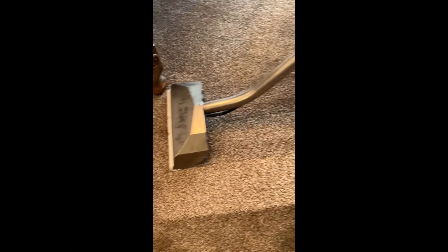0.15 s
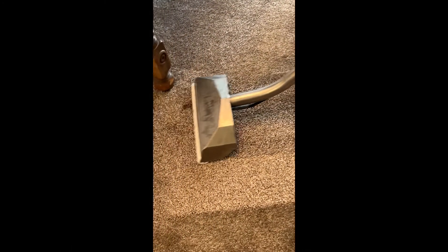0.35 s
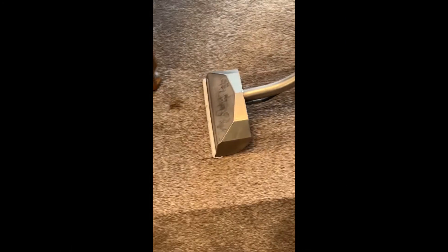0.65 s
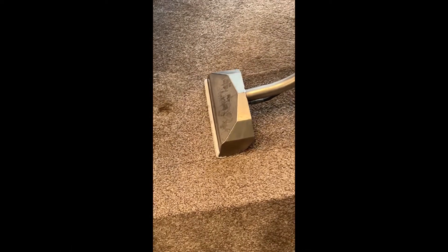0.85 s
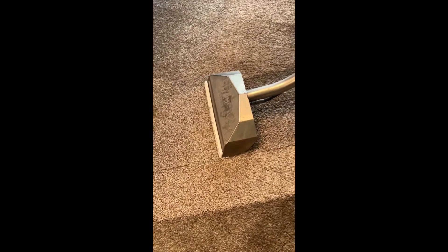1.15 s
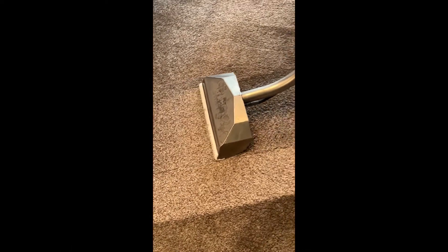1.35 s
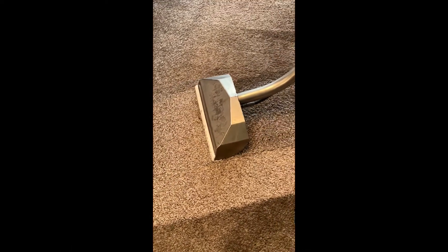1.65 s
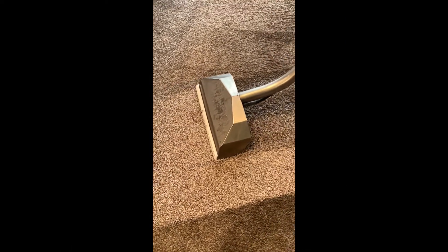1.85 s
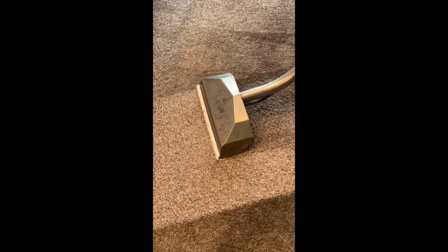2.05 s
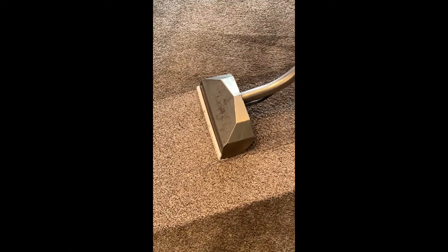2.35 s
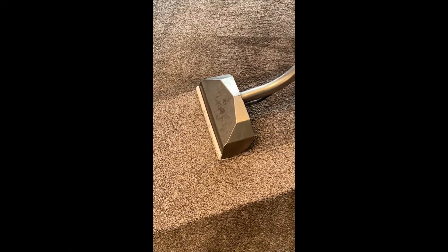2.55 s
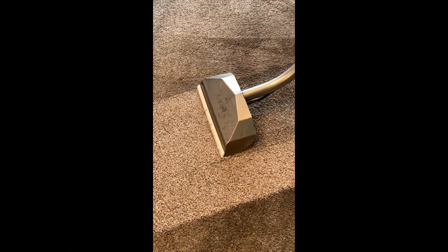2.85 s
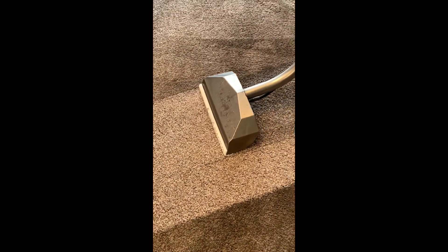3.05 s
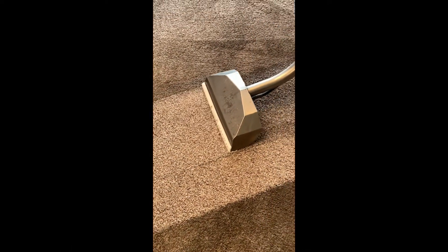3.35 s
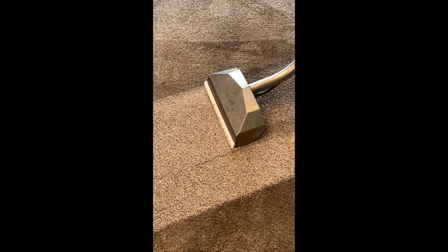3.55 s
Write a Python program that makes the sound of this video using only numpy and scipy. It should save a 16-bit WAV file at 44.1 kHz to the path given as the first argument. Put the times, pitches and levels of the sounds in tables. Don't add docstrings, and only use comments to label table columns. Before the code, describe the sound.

Carpet vacuum nozzle rushing air, hissing and whistling shrilly, with one short drag at the start.

```python
import sys
import numpy as np
from scipy import signal
from scipy.fft import rfft, irfft, next_fast_len
from scipy.io import wavfile
from scipy.ndimage import uniform_filter1d

SR = 44100
rng = np.random.default_rng(int(sys.argv[2]) if len(sys.argv) > 2 else 0)


def volts_from_db(level):
    exponent = np.asarray(level, float) / 20
    return 10 ** exponent


def inscribe(sig):
    pcm = np.round(np.clip(np.atleast_2d(sig).T, -1, 1) * 32767)
    wavfile.write(sys.argv[1], SR, pcm.astype(np.int16))


N = 163170
T = np.arange(N) / SR


def evened(x):
    return x / np.sqrt(np.mean(abs(x) ** 2) + 1e-20)


def read(points, hz):
    f, db = np.transpose(points)
    return np.interp(np.log(hz + 1), np.log(f + 1), db)


def follow(points):
    return np.interp(T, *np.transpose(points))


def drift(hz):
    hop = 32
    f = np.fft.fftfreq(N // hop + 2, hop / SR)
    chance = rng.standard_normal((len(f), 2)) @ [1, 1j]
    slow = evened(np.fft.ifft(chance / (1 + (f / hz) ** 2)))
    return np.interp(np.arange(N) / hop, np.arange(len(f)), slow)


def tone(hz, db, share, fade_hz):
    share = np.clip(share, 0, 1)
    strength = np.sqrt(1 - share ** 2) + share * drift(fade_hz)
    turns = np.cumsum(hz * np.ones(N)) / SR + rng.random()
    return np.sqrt(2) * volts_from_db(db) * (strength * np.exp(2j * np.pi * turns)).real


# pitch_hz, level_db [rms], fading_share [0..1]
HUM_LINES = [(58.2, -40.5, 0.23), (104, -52.5, 0.92), (161, -57.5, 0.98), (224, -51.5, 0.42),
             (371.8, -46.5, 0.05), (740, -54, 0.59)]


def blower():
    hum = 0
    for hz, db, share in HUM_LINES:
        hum = hum + tone(hz * (1 + 0.00594 * drift(1.315).real), db, share, fade_hz=5.1)
    return hum


# from_hz, most_hz, to_hz, unlike_share [0..1]
UNLIKE_BANDS = [(230, 750, 1600, .17), (4400, 4700, 5035, .22), (5065, 5350, 5650, .3),
                (8200, 9500, 13000, .5), (15000, 15400, 16000, .045)]


def air(shape, patchy_db, swell_db):
    frames, hz = N // 256 + 5, np.fft.rfftfreq(1024, 1 / SR)
    a, b, c, d, patches = rng.standard_normal((frames, 513, 5)).T
    patches = uniform_filter1d(patches, size=12, axis=1)
    patches = evened(uniform_filter1d(patches, size=14, axis=0))
    swell = np.interp(np.arange(frames) * 256, np.arange(N), drift(1.2).real)
    unlike = 0
    for low, most, high, share in UNLIKE_BANDS:
        unlike = unlike + share * np.sqrt(np.interp(hz, [low, most, high], [0, 1, 0]))
    same = np.clip(1 - unlike, 0, 1)[:, None]
    left = a + 1j * b
    right = same * left + np.sqrt(1 - same ** 2) * (c + 1j * d)
    level_db = read(shape, hz)[:, None] + patchy_db * patches + swell_db * swell
    spectrum = np.array([left, right]) * volts_from_db(level_db)
    return evened(signal.istft(spectrum, nperseg=1024, noverlap=768)[1][:, :N])


def leak():
    leak_db, hold_s, seal_s = 7, .28, .25
    return leak_db * np.exp(-np.maximum(T - hold_s, 0) / seal_s)


# pitch_hz, level_db [per Hz]
ROAR_SHAPE = [(30, -43), (75, -0.5), (160, -1), (310, -3.5), (750, -2), (1600, -8), (2900, -5.5),
              (5000, -11.5)]


def roar():
    return volts_from_db(-32.5 + .1 * leak()) * air(ROAR_SHAPE, patchy_db=1.1, swell_db=0.1)


# pitch_hz, level_db [per Hz]
HISS_SHAPE = [(3500, -16), (5200, -4), (7000, -4.5), (9800, -43), (11000, -7), (12000, 9.5), (13000, -1),
              (15700, -3)]


def hiss():
    return volts_from_db(-39.5 + leak()) * air(HISS_SHAPE, patchy_db=.7, swell_db=.3)


# start_s, level_db
DRAG_LEVEL = [
    (0, -39),
    (.09, -32),
    (.145, -24.5),
    (.205, -21),
    (.245, -25.5),
    (.29, -26),
    (.32, -32),
    (.7, -35.5),
    (1.2, -41),
]
# pitch_hz, level_db [per Hz]
PILE_SHAPE = [(80, -16), (200, -7), (380, -6.5), (600, -1), (820, 0), (1250, -10), (2800, -15), (4800, -28)]


def scrape():
    fibres_per_s = 1500
    flicks = (rng.random(N) < fibres_per_s / SR) * volts_from_db(2.1 * rng.exponential(1, N))
    grain = 3.9 + evened(uniform_filter1d(flicks, size=120))
    after_s = np.maximum(T - DRAG_LEVEL[-1][0], 0)
    level_db = follow(DRAG_LEVEL) - 9 * after_s
    return volts_from_db(level_db) * evened(air(PILE_SHAPE, patchy_db=-0.35, swell_db=-2) * grain)


# start_s, pitch_hz
SEVENTH_PITCH = [(0, 6636), (.27, 6638), (.5, 6656), (.9, 6663), (1.0, 6650), (1.25, 6643), (1.6, 6652),
                 (1.82, 6668), (2.0, 6661), (2.25, 6668), (2.66, 6670), (2.88, 6642), (3.12, 6657),
                 (3.38, 6640), (3.55, 6654), (3.7, 6654)]
# start_s, level_db
LOWEST_LEVEL = [(0, -42), (.6, -43.5), (1.1, -41.5), (1.8, -40.5), (2.1, -38.5), (2.8, -38), (2.87, -47),
                (3.3, -43), (3.7, -40.5)]
# start_s, level_db
SEVENTH_LEVEL = [(0, -33), (.1, -24.5), (.27, -36.5), (.5, -30.5), (.9, -31.5), (1.0, -40.5), (1.2, -44),
                 (1.45, -37.5), (1.6, -41.5), (1.82, -38.5), (2.0, -42), (2.25, -34.5), (2.66, -28.5),
                 (2.88, -39), (3.12, -33), (3.35, -41), (3.55, -32.5), (3.7, -45)]
# start_s, level_db
NINTH_LEVEL = [(0, -47), (.45, -48), (1.15, -41), (1.55, -53), (2.15, -38), (2.4, -45.5), (2.65, -38.5),
               (2.9, -49), (3.7, -46)]
# multiple [of the lowest tone], level_db [rms], fading_share [0..1], loudest_s
OVERTONES = [(2, -59.5, 0.42, 2.13), (3, -50.5, 0.19, 0.43), (4, -60, 0.84, 0.66), (5, -61, 0.33, 1.2),
             (6, -61, .7, 2.6), (7.5, -56, 1, 2.7), (8, -55, 1, .1), (10, -51.5, 0.4, .1),
             (11, -49, 0.71, 0.19), (12, -47, 1, 2.3), (12.5, -54, .97, 2.3), (13, -45, 0.78, 0.37),
             (13.5, -54, .97, .1), (14, -52, .8, 3.), (14.5, -47, .97, .1), (15, -43, .75, 3.3),
             (15.5, -50, .97, .2), (16, -55, .95, 3.2)]


def whistle():
    lowest_hz = follow(SEVENTH_PITCH) / 7 * (1 + 0.001344 * drift(9).real)
    out = tone(lowest_hz, follow(LOWEST_LEVEL), .15, fade_hz=8)
    for multiple, points in [(7, SEVENTH_LEVEL), (9, NINTH_LEVEL)]:
        hz, db = lowest_hz * multiple, follow(points)
        out = out + tone(hz, db, .45, fade_hz=13)
        out = out + tone(hz, db - 9, 1, fade_hz=70)
    swell_db, swell_s = 6.5, 0.59
    for multiple, db, share, loudest_s in OVERTONES:
        bloom = swell_db * np.exp(-((T - loudest_s) / swell_s) ** 2)
        out = out + tone(lowest_hz * multiple, db + bloom, share, fade_hz=0.86 * multiple)
    return out


def scene():
    return blower() + roar() + hiss() + scrape() + whistle()


# pitch_hz, phase [turns]
RIGHT_LEAD = [(200, 0), (850, .05), (1100, 0), (4660, 0), (5440, 1), (8200, 1), (8530, 1.16), (12900, 1.5)]
# pitch_hz, level_db
RIGHT_TILT = [(200, 0), (330, .6), (520, 2.5), (740, 5.3), (1250, 4.5), (1600, 0)]


def ports(dry):
    size = next_fast_len(N + 4096)
    hz = np.fft.rfftfreq(size, 1 / SR)
    turns = np.interp(hz, *np.transpose(RIGHT_LEAD))
    tilt_db = read(RIGHT_TILT, hz)
    left = volts_from_db(-.5 * tilt_db)
    right = volts_from_db(.5 * tilt_db) * np.exp(2j * np.pi * turns)
    edge = np.clip((15750 - hz) / 100 + .5, 0, 1)
    return irfft(rfft(dry, size) * np.array([left, right]) * edge, size)[:, :N]


def roll_off(x):
    return signal.sosfilt(signal.butter(12, 16080, fs=SR, output="sos"), x)


def record(dry):
    mix = ports(dry)
    return roll_off(mix)


dry = scene()
out = record(dry)
inscribe(out)
```